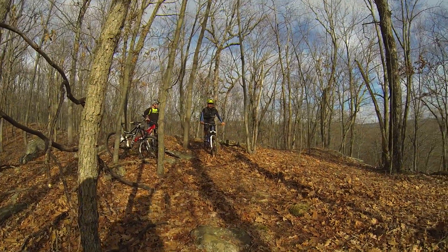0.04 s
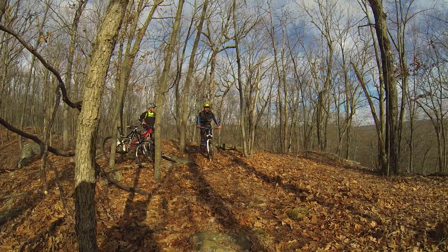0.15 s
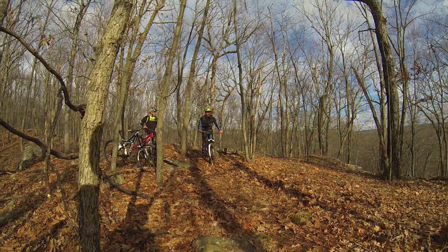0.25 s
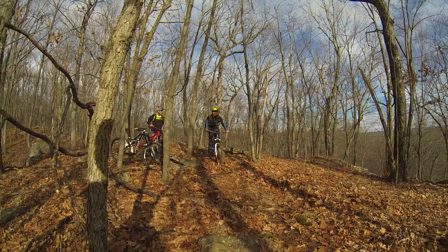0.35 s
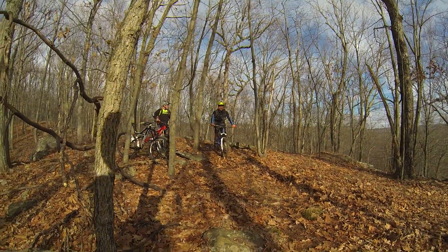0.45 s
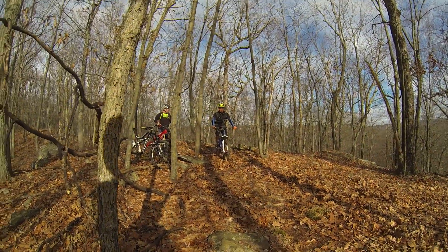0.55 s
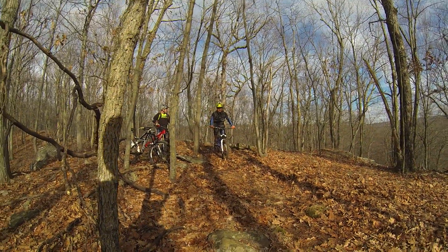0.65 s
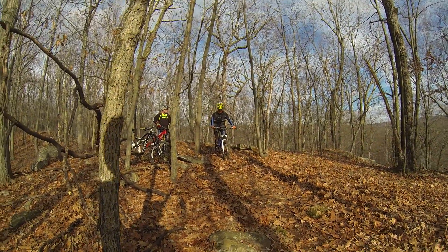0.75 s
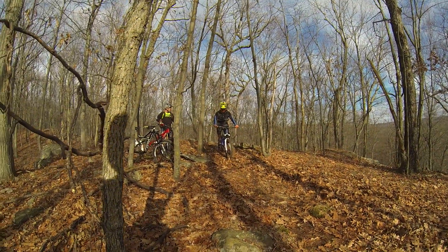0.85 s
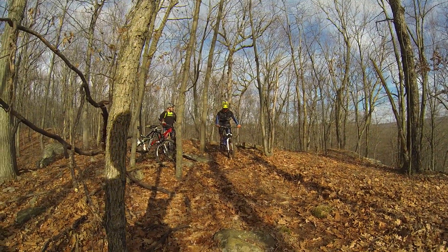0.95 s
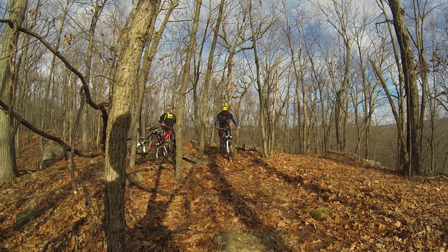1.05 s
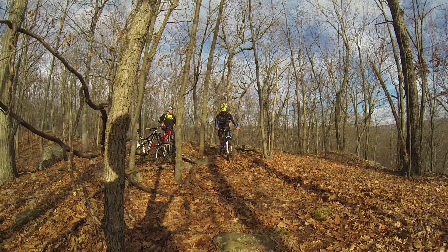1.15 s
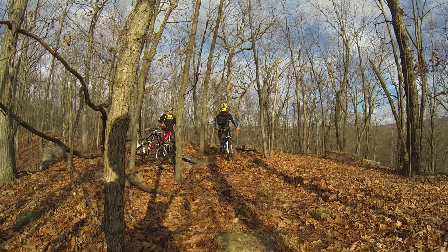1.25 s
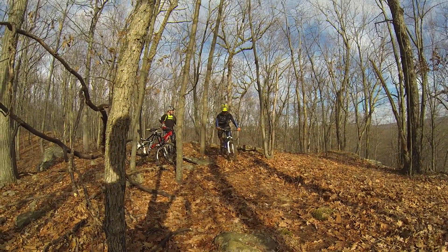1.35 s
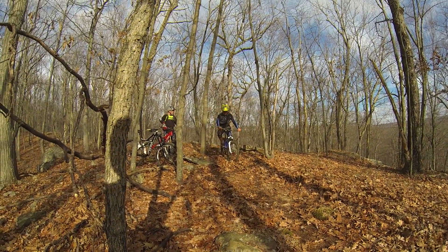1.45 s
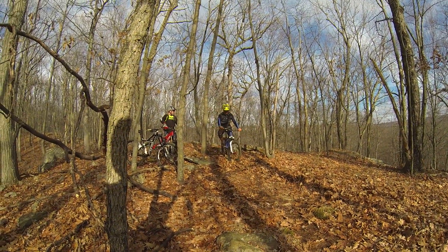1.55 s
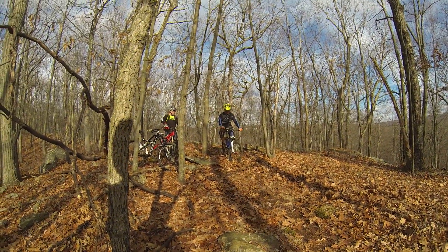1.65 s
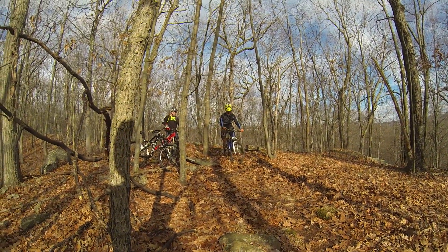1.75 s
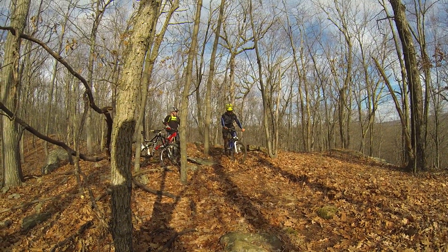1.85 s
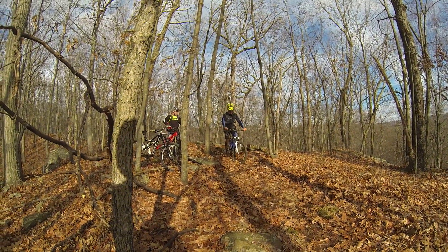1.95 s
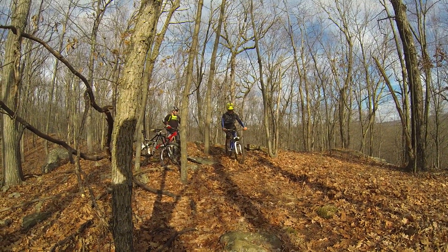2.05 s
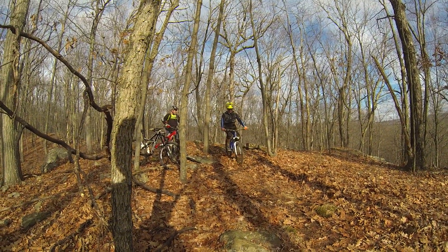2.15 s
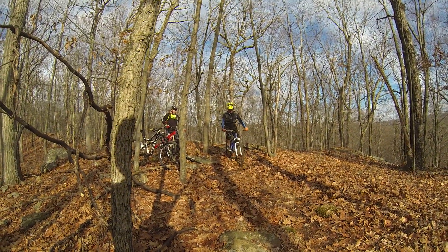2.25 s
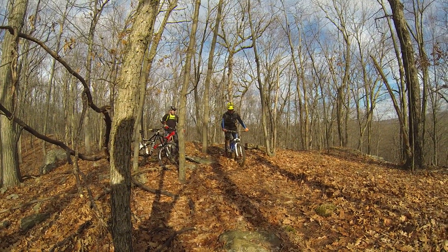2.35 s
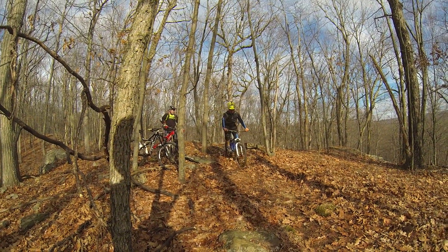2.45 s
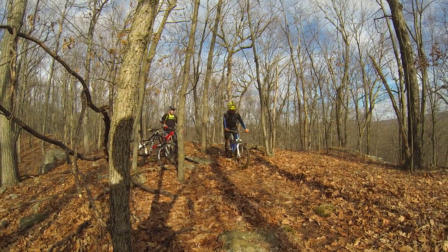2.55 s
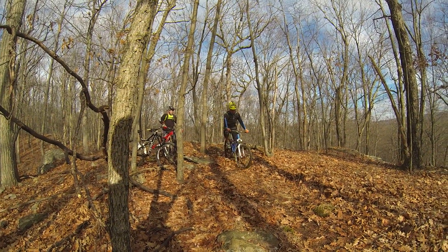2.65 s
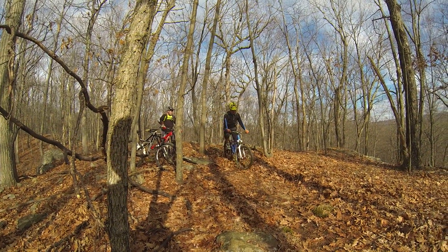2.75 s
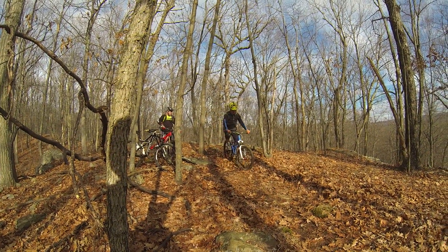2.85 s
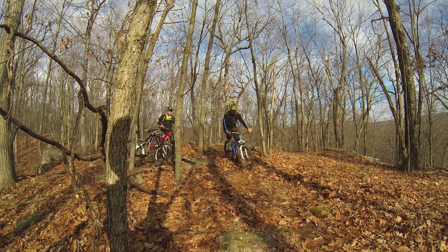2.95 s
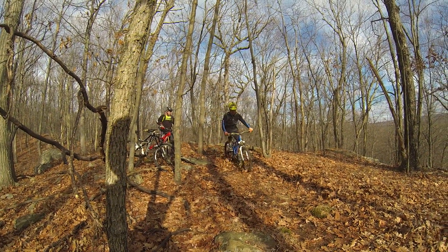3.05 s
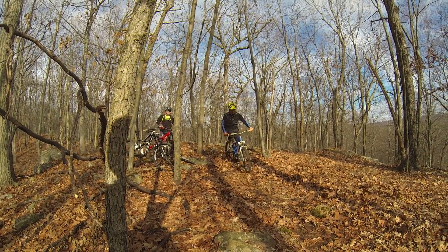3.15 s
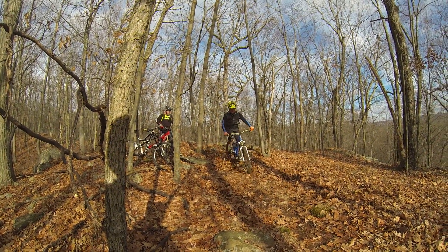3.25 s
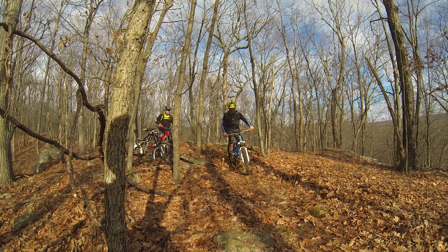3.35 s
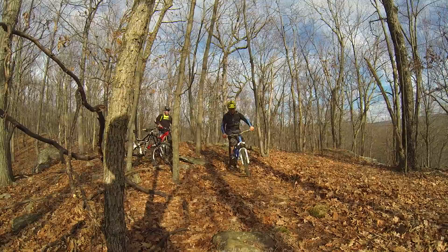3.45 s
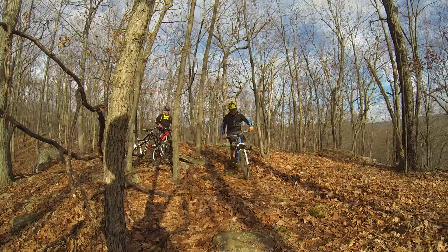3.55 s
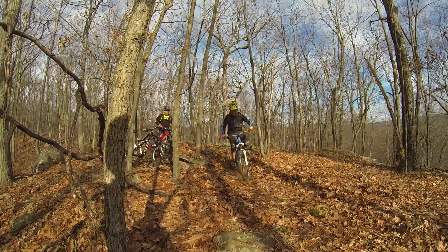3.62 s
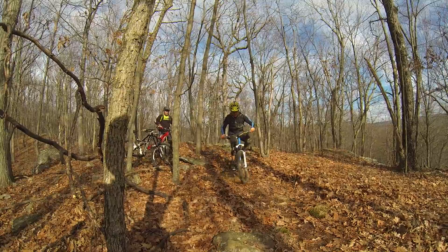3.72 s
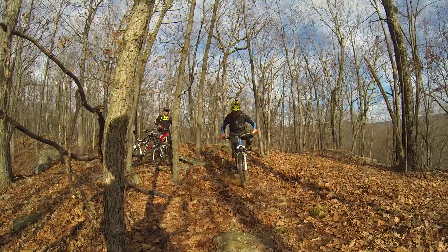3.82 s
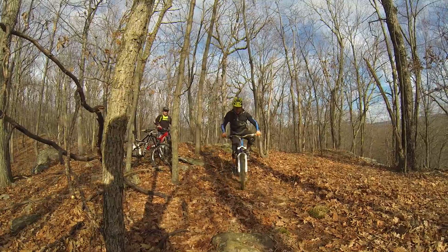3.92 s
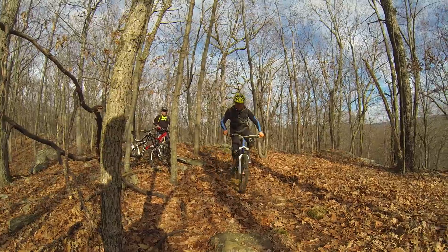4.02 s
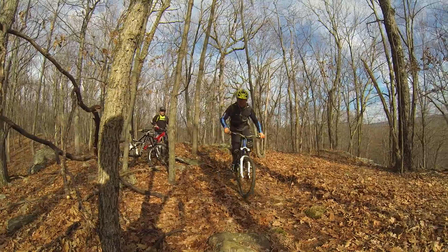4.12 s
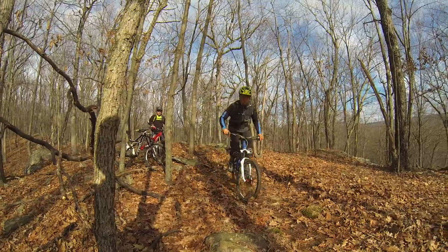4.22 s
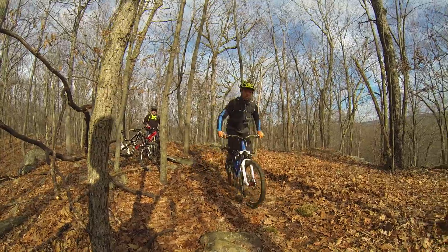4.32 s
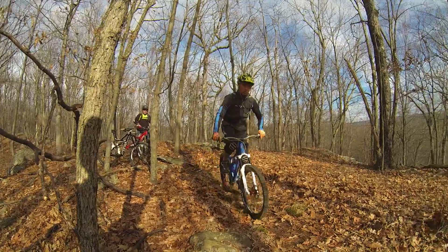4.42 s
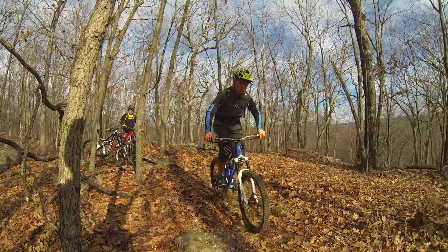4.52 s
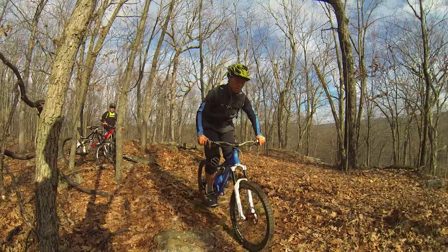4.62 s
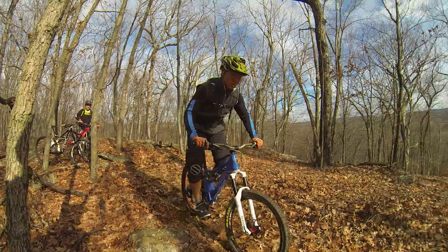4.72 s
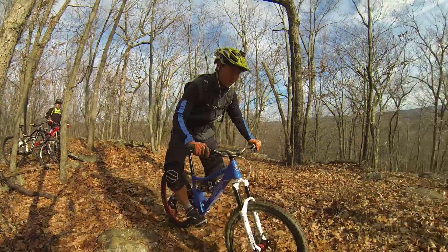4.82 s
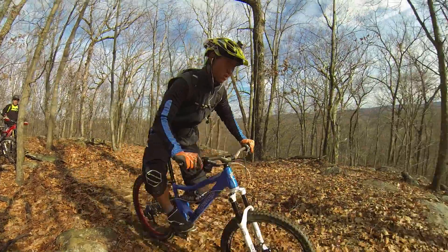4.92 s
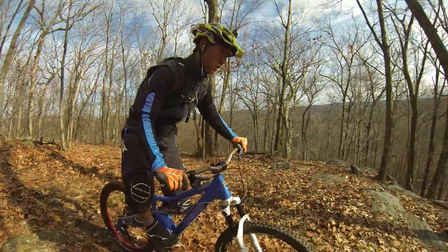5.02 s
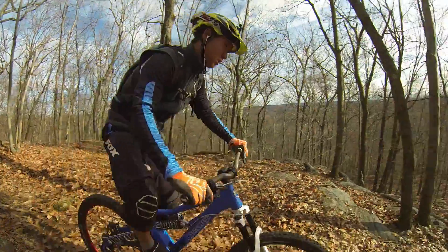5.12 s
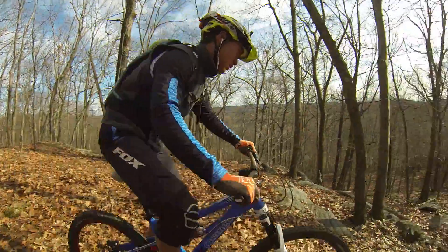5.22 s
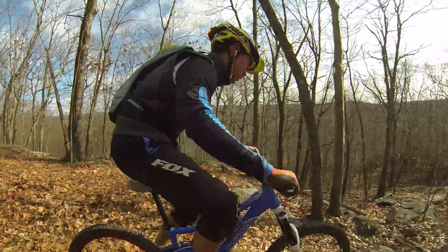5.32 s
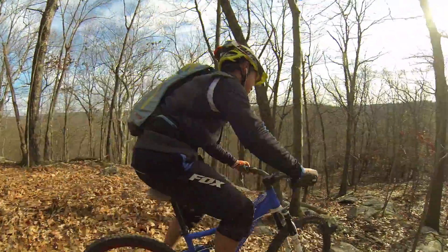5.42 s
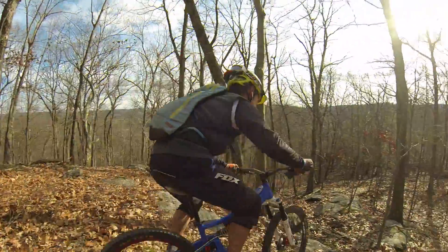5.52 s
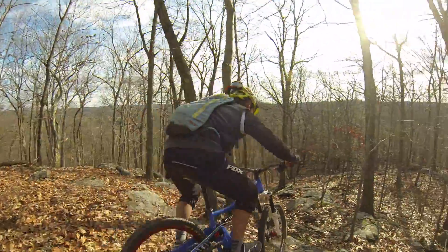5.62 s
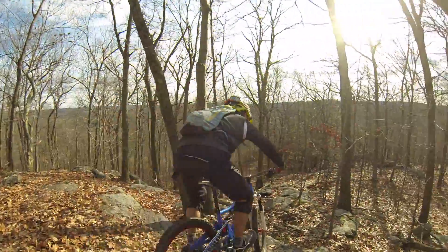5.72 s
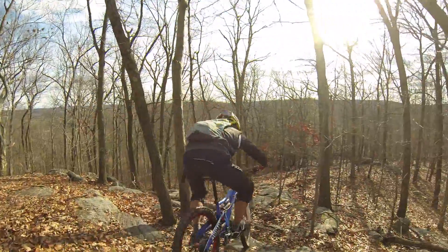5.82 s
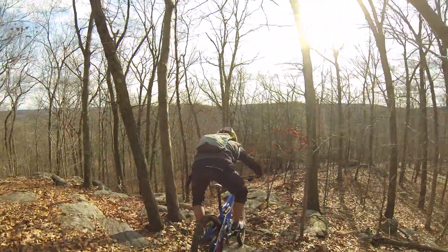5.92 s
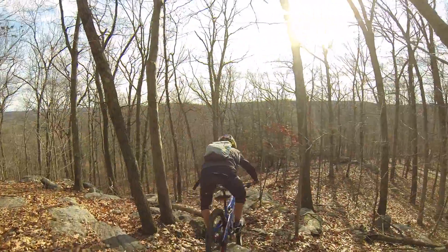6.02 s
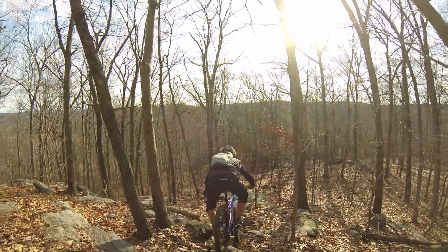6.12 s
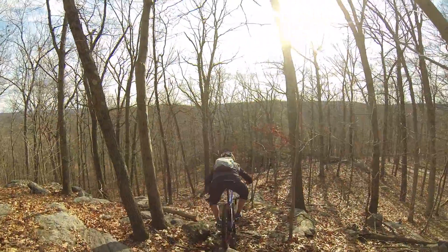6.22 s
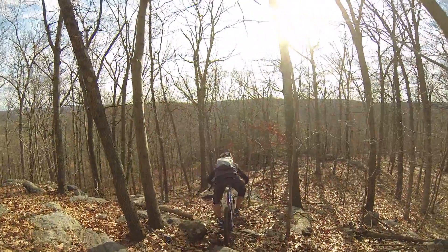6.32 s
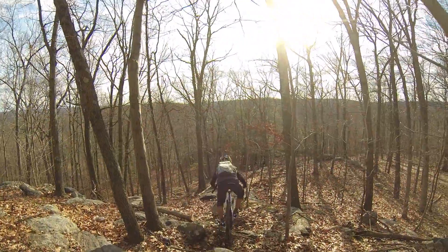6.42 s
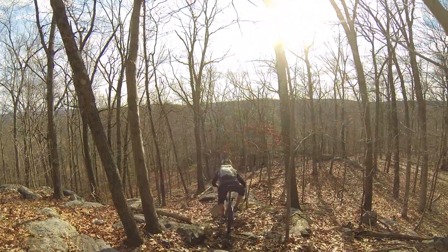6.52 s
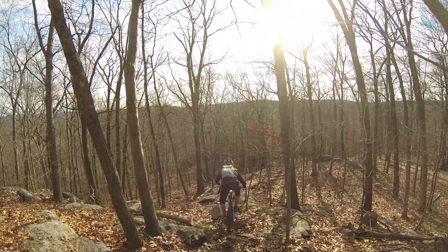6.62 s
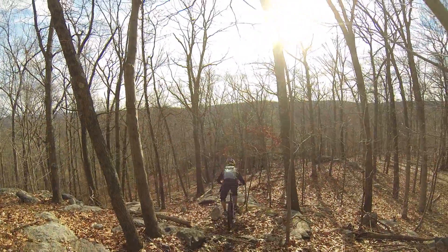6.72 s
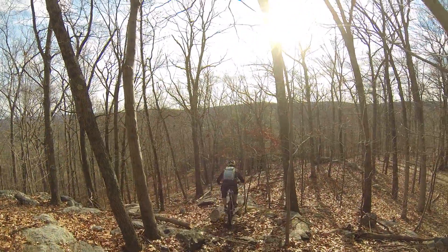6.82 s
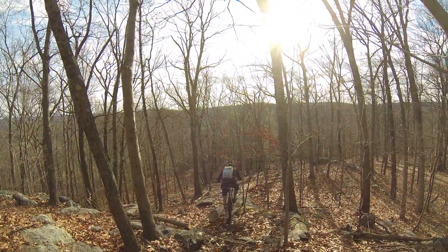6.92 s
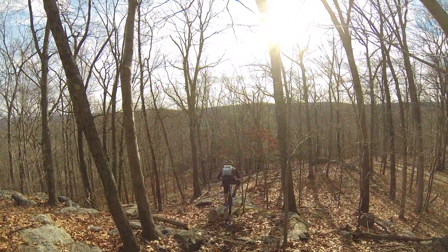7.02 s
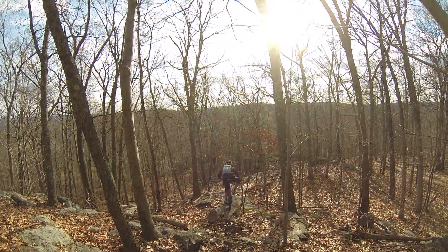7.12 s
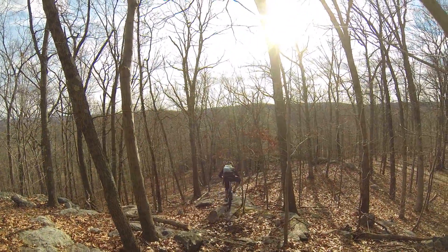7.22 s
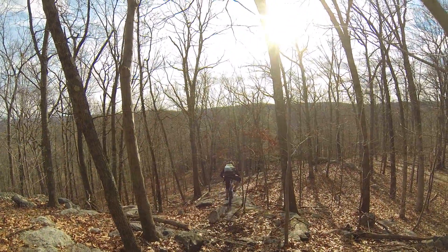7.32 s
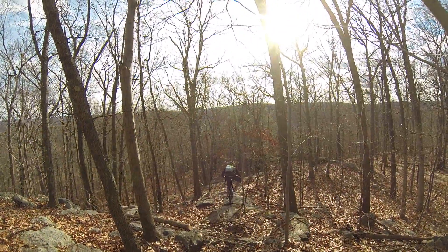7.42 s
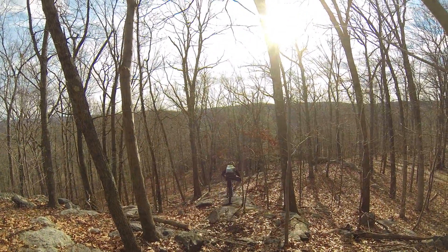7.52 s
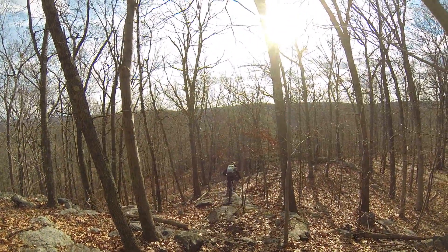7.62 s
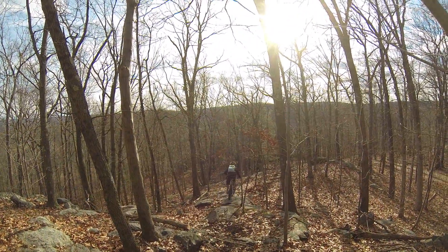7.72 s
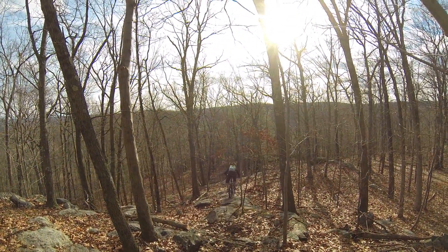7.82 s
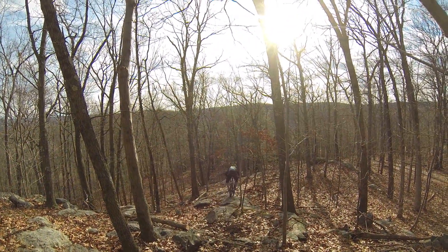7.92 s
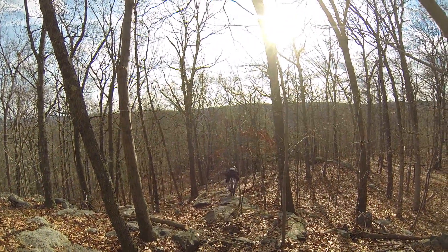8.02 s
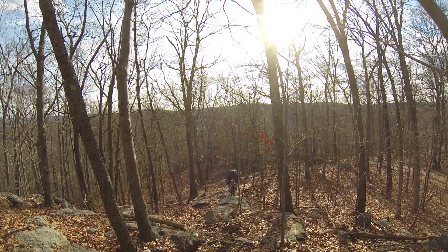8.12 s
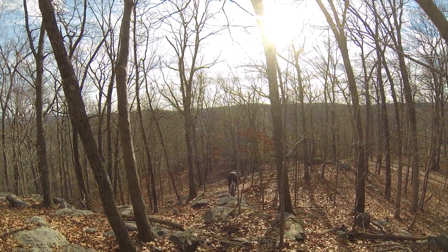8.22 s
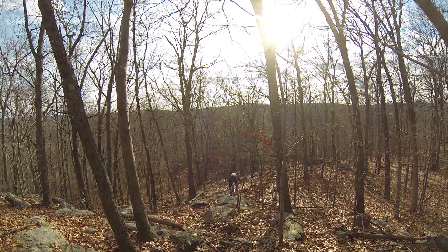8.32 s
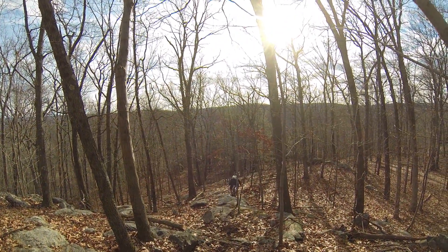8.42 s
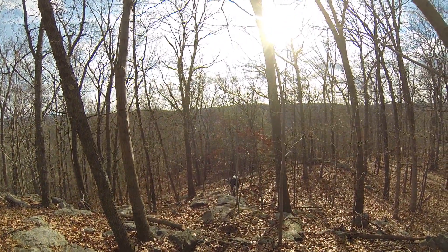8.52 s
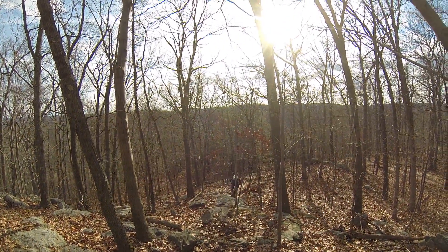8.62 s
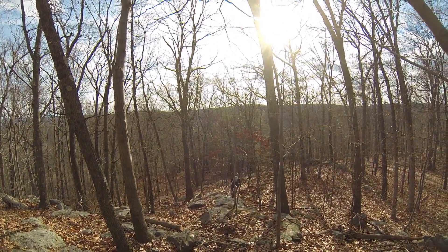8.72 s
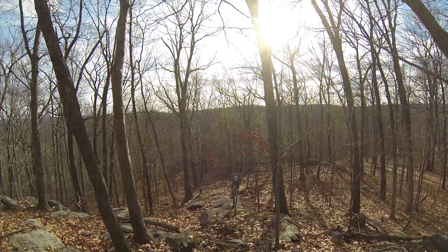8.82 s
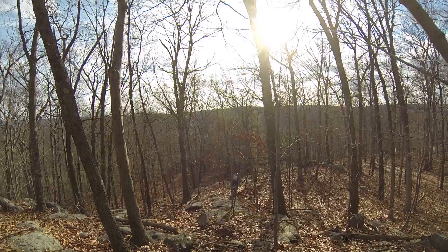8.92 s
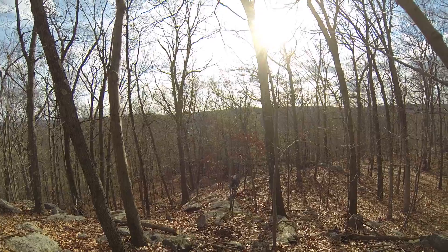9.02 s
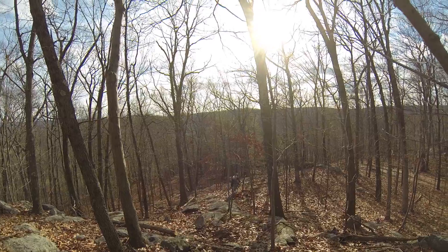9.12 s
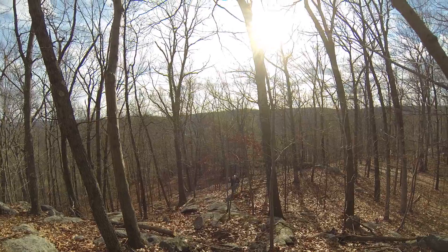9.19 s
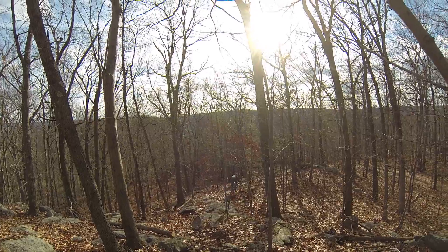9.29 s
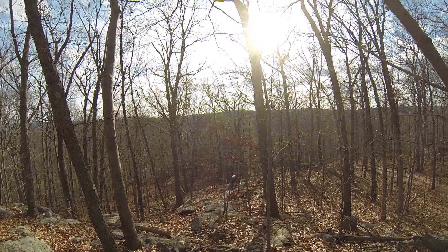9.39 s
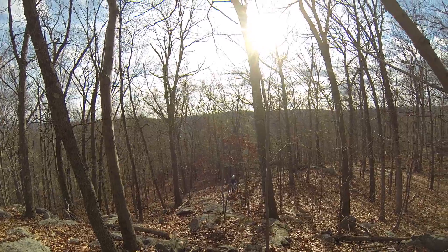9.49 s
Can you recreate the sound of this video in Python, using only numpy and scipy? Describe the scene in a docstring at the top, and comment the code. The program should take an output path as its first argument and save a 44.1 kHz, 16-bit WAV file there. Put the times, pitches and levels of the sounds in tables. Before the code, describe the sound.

Leaves rustle and a few dull bumps sound right by the microphone in quiet woodland. A mountain bike approaches, its tyres crunching dry leaves, with metallic knocks and a brief brake honk. It passes close, chain and frame clattering and freewheel ticking, while wind rumbles on the microphone. The bike then fades away with several short brake squeaks.

```python
"""A mountain bike rolls through dry leaves towards a small cased camera, passes close and runs downhill.
Leaves crackle as the tyres crush them, chain and frame clatter over bumps, the freewheel ticks,
and the brakes honk as their pads stick and slip. The metal sounds echo between the trees.
A foot shuffles in the leaves by the camera, and air buffets the microphone once the bike goes by."""
import sys
import numpy as np
from scipy import signal
from scipy.fft import rfft, irfft
from scipy.io import wavfile
from scipy.ndimage import uniform_filter1d

SR = 44100
rng = np.random.default_rng(int(sys.argv[2]) if len(sys.argv) > 2 else 0)


def bounce(signal):
    """Save signal as a 16-bit WAV file at the path given by the first command-line argument."""
    frames = np.transpose(np.atleast_2d(signal))
    limited = np.clip(frames, -1, 1)
    pcm = np.round(limited * 32767).astype(np.int16)
    wavfile.write(sys.argv[1], SR, pcm)


N = 421243
TIME = np.arange(N) / SR

# how hard the tyres crush the leaves: (time [s], level [dB])
CRUNCH_LEVEL = [(1.05, -69.5), (1.46, -55.5), (1.85, -57), (2.2, -46.5), (2.8, -44.5), (3.2, -47.5),
                (3.88, -48.5), (4.17, -53), (4.55, -41.5), (4.82, -37), (5.3, -38), (5.9, -35.5),
                (6.15, -40.5), (6.5, -43), (6.85, -47.5), (8.0, -51), (8.55, -49), (9.55, -52)]
# the treble of leaves heard from afar: (frequency [Hz], level [dB])
CRISP_FAR = [(2800, -49.5), (3800, 8.5), (4700, 3), (5500, 1.5), (6300, -5.5), (7000, -6.5), (8300, 0),
             (9100, -8.5), (10600, -0.5), (11700, -7.5), (12700, -9), (13500, -17), (15300, -17.5)]
# the treble of close clicks, with the camera case ringing near 8 kHz: (frequency [Hz], level [dB])
CRISP_NEAR = [(3000, -69), (4100, -11), (4700, -5), (5250, -7), (5800, -13.5), (7000, -19), (7700, -10.5),
              (8350, 0.5), (9300, -10), (10600, -10), (11800, -20.5), (12800, -16), (13900, -27),
              (15000, -27)]
# the notes the bike frame rings with: (frequency [Hz], level [dB], time to fade by 60 dB [s])
FRAME_NOTES = [(856, 9, 0.02), (1679, -5.5, 0.024), (1900, 8, 0.0046), (3240, -19, 0.011),
               (5200, -22, .008), (8350, -28, .009)]
# how the camera case muffles a knock: (frequency [Hz], level [dB])
CASE_MUFFLING = [(200, 42), (850, -1.5), (1200, 7), (1700, 4.5), (2700, 6), (3300, 9.5), (3900, 2),
                 (5200, 5.5), (7000, -5), (12000, -12)]


def amp(db):
    """Turns decibels into a number to multiply by."""
    return 10 ** (np.asarray(db) / 20)


def unit(x):
    """Scales a sound to an average strength (rms) of 1."""
    return x / np.sqrt(np.mean(x ** 2) + 1e-20)


def unit_hit(x):
    """Scales a hit so that its loudest 4 ms have an average strength of 1."""
    return x / np.sqrt(uniform_filter1d(x ** 2, 176, mode="constant").max())


def follow(rows):
    """Joins (time, value) points with straight lines."""
    return np.interp(TIME, *np.transpose(rows))


def swell(start, rise, hold, fall):
    """Rises smoothly from 0 to 1, holds and falls back; times in seconds."""
    ramp = np.minimum((TIME - start) / rise, (start + rise + hold + fall - TIME) / fall)
    return np.sin(np.pi / 2 * np.clip(ramp, 0, 1)) ** 2


def puff(middle, length):
    """A swell that falls as soon as it has risen."""
    return swell(middle - length / 2, length / 2, 0, length / 2)


def add(mix, s, sound):
    """Mixes a sound in at s seconds."""
    part = mix[max(round(s * SR), 0):][:len(sound)]
    part += sound[:len(part)]


def colour(x, points, size=8192):
    """Shapes a sound's lows and highs by (frequency, level) points; clicks keep their sharp start."""
    hz, db = np.transpose(points)
    log_hz = np.log(abs(np.fft.fftfreq(size, 1 / SR)) + 1)
    log_gain = np.log(amp(np.interp(log_hz, np.log(hz), db)))
    taps = np.fft.ifft(np.exp(np.conj(signal.hilbert(log_gain)))).real[:size // 2]
    return signal.oaconvolve(x, taps)[:len(x)]


def drift(rate, count=N):
    """A smooth random wobble that changes up to about rate times a second."""
    hz = np.fft.rfftfreq(count, 1 / SR)
    return unit(irfft(rfft(rng.standard_normal(count)) / np.sqrt(1 + (hz / rate) ** 6), count))


def resonate(x, hz, *widths_hz):
    """Keeps the sound near one pitch, filtering once for each width given."""
    for width_hz in widths_hz:
        x = signal.lfilter(*signal.iirpeak(min(hz, SR / 2 - 1), hz / width_hz, SR), x)
    return x


def snaps(per_s, spread_db):
    """Clicks at random times and of uneven sizes."""
    size = amp(spread_db * np.minimum(rng.exponential(1, N), 5))
    return unit(size * rng.choice([-1, 1], N) * (rng.random(N) < per_s / SR))


def woodland():
    """Distant air in bare trees, swelling slightly, and the faint stir of dry leaves."""
    # the hush of the trees: (frequency [Hz], level [dB])
    hush = [(25, -1), (90, -4), (170, -7), (300, -6.5), (480, -11), (850, -4.5), (1200, -15), (1700, -16),
            (2500, -31), (3100, -19.5), (4100, -41), (7000, -42.5), (8400, -43), (13000, -57)]
    air = amp(-50.5 + 0.87 * drift(rate=1.9)) * unit(colour(rng.standard_normal(N), hush))
    stir = snaps(per_s=900, spread_db=5.5) + rng.standard_normal(N)
    return air + amp(-74.5) * unit(colour(stir, CRISP_FAR))


def tree_echoes(x, fade_s, level_db):
    """Trunks scatter a sound back as thin echoes that drop by 60 dB in fade_s."""
    # the tone of the echoes: (frequency [Hz], level [dB])
    echo_tone = [(150, 21), (900, 6.5), (2200, -5.5), (5000, 12), (12000, -5.5)]
    t = np.arange(SR // 2) / SR
    echoes = rng.standard_normal(len(t)) * (rng.random(len(t)) < 1500 / SR) * (t > .008)
    tail = colour(echoes * np.exp(-np.log(1000) * t / fade_s), echo_tone)
    return amp(level_db) * signal.oaconvolve(x, tail / np.linalg.norm(tail))[:N]


def wind():
    """Swirling air pushes on the microphone in lumps; strong gusts also throb and flutter."""
    # single gusts: (middle time [s], length [s], level [dB])
    gust_list = [(1.9, 0.073, -48), (4.731, 1, -44), (5.414, 0.22, -24), (5.527, 0.12, -23),
                 (6.01, 0.38, -28), (6.698, 0.11, -32), (7.056, 0.97, -40), (7.73, 0.15, -37.5),
                 (8.587, .08, -34), (8.726, 0.049, -34), (9.35, 0.061, -35.5), (9.513, .13, -35)]
    # the rumble of air on the microphone: (frequency [Hz], level [dB])
    rumble = [(10, -8), (26, -0.5), (50, -5.5), (85, -6), (110, -15.5), (170, -16), (260, -26),
              (450, -56.5), (1000, -115)]
    wake_s, fade_db_per_s = 5.27, 13.5  # the air dragged behind the bike arrives, then dies away
    passed = swell(wake_s, rise=0.11, hold=N / SR, fall=1)
    wake = passed * amp(-25 - fade_db_per_s * (TIME - wake_s))
    calm, breeze = amp(-53), passed * amp(-44)
    gusts = [amp(db) * puff(s, length) for s, length, db in gust_list]
    level_db = 10 * np.log10(sum(air ** 2 for air in [calm, breeze, wake, *gusts]))
    swirls = unit(colour(rng.standard_normal(N), rumble))
    throb = unit(resonate(resonate(rng.standard_normal(N), 99, 30), 94, 92))
    flutter = unit(resonate(resonate(rng.standard_normal(N), 181, 130), 120, 184))
    strength = amp(.5 * np.minimum(level_db + 23, 0))
    lumps_db = 2 * drift(rate=10)
    return amp(level_db + lumps_db) * (swirls + strength * (0.3 * throb + 0.24 * flutter))


def swept_leaves():
    """A shoe or wheel sweeps leaves aside in swells of fine crackle that make the camera case ring."""
    # sweeps of leaves: (start [s], rise [s], hold [s], fall [s], level [dB])
    sweeps = [(-.1, 0.084, 0.48, 0.32, -48.5), (0.179, 0.094, 0.072, 0.048, -43.5),
              (0.269, 0.077, .005, 0.083, -36), (6.37, 0.059, 0.052, 0.084, -36)]
    # the tone of swept leaves: (frequency [Hz], level [dB])
    rustle_tone = [(200, -11.5), (550, -11), (870, 0), (1200, -7), (1700, 2), (2250, -7.5), (2720, -19.5),
                   (3200, -12), (3850, -27.5), (4900, -23.5), (6900, -36), (8450, -16.5), (11400, -43),
                   (15000, -43)]
    level = sum(amp(db) * swell(*shape) for *shape, db in sweeps)
    grains = snaps(per_s=3500, spread_db=4.5) + 0.83 * rng.standard_normal(N)
    rustle = colour(grains, rustle_tone)
    case_ring = 4.0 * resonate(rustle, 12700, 800)
    return level * unit(rustle + case_ring)


def bumps():
    """Dull bumps: each is a soft push of a cycle or two and a brief hollow knock."""
    # hand and feet at the camera, wheels on roots: (time [s], level [dB], pitch [Hz])
    thuds = [(0.095, -22.5, 149), (.17, -26.5, 800), (0.305, -35, 197), (.69, -35, 215), (.711, -30.5, 198),
             (0.837, -29.5, 158), (2.2915, -29, 261), (4.509, -26, 480), (4.598, -22.5, 157),
             (5.6411, -22, 517), (6.0612, -16.5, 444), (6.466, -14, 477), (7.234, -29.5, 482),
             (9.0195, -24.5, 360)]
    out, t = np.zeros(N), np.arange(SR // 12) / SR
    for s, db, hz in thuds:
        push = np.sin(2 * np.pi * hz * t) * np.exp(-t * hz / 0.41)
        hollow = 0.81 * np.sin(2 * np.pi * 850 * t) * np.exp(-t / 0.0011)
        add(out, s, amp(db) * (push + hollow))
    return signal.lfilter(*signal.butter(2, 1600, fs=SR), out)


def brake_drag():
    """Pads skim the brake disc with a thin, ticking sizzle."""
    # light touches of the pads: (start [s], length [s], level [dB])
    touches = [(3.75, 0.39, -74.5), (4.347, 0.26, -64)]
    ease_s = 0.08
    level = sum(amp(db) * swell(s, ease_s, length - 2 * ease_s, ease_s) for s, length, db in touches)
    rub = snaps(per_s=200, spread_db=-1.5) + .5 * rng.standard_normal(N)
    grip = amp(4.5 * drift(rate=60))
    return level * grip * unit(resonate(resonate(rub, 10600, 930), 8800, 2000))


def brake_honk(pitch_hz=872):
    """Pads stick and slip, so the brake disc sings one clean note at each squeeze."""
    # squeezes: (middle time [s], length [s], level [dB], octave above against the note [dB])
    squeezes = [(2.409, 0.14, -34, -6.5), (2.494, 0.11, -36.5, -5), (2.56, .09, -50, -9)]
    phase = 2 * np.pi * np.cumsum(pitch_hz * (1 + 0.0013 * drift(rate=60))) / SR
    return sum(amp(db) * puff(s, length) * unit(np.sin(phase) + amp(octave_db) * np.sin(2 * phase))
               for s, length, db, octave_db in squeezes)


def brake_squeaks():
    """Slipping pads hiss and squeak in short arches of pitch, rough under hard braking."""
    # squeaks: (start [s], length [s], level [dB], pitch [Hz], glide [share of the pitch],
    # roughness [0-1], octave above against the note [dB])
    squeaks = [(0.115, 0.074, -40.5, 1340, -0.074, 0.2, -28), (7.274, .086, -47.5, 1270, -0.074, 0.3, -28),
               (7.418, 0.075, -50, 1420, 0.088, 0.33, -22), (7.817, 0.1, -54, 1346, -0.11, 0.4, -34),
               (8.397, 0.033, -32.5, 1053, 0.033, 0.48, -9), (8.417, 0.0544, -36.5, 1008, 0.031, 0.99, 1),
               (8.661, 0.084, -36.5, 1091, -0.11, 0.81, -1.5), (9.027, .077, -50.5, 1406, 0.1, 0, -15)]
    # the hiss of the pads: (frequency [Hz], level [dB])
    pad_hiss = [(6500, -39), (8200, -7), (9200, 0), (10600, -4), (11800, -22), (15000, -32)]
    out = np.zeros(N)
    for s, length, db, pitch_hz, glide, rough, octave_db in squeaks:
        count = round(length * SR)
        position = np.linspace(-1, 1, count)
        arch = 1 + glide * position / 2 - .13 * position ** 2
        jitter = 1 + .14 * rough ** 2 * drift(rate=300, count=SR)[:count]
        flutter = amp(4 * rough * drift(rate=260, count=SR)[:count])
        phase = 2 * np.pi * np.cumsum(pitch_hz * arch * jitter) / SR
        tone = np.sin(phase) + amp(octave_db) * np.sin(2 * phase)
        hiss = amp(-29) * unit(colour(rng.standard_normal(SR), pad_hiss))[:count]
        add(out, s, amp(db) * (unit(tone * flutter) + hiss) * signal.windows.tukey(count, .6))
    return out


def freewheel():
    """Small catches in the hub tick over a toothed ring; far off, only a thin buzz carries back."""
    # the ticking slows as the bike coasts past, then races downhill: (time [s], rate [ticks/s])
    tick_rate = [(4.997, 41.5), (5.35, 39), (5.47, 31.4), (6.2, 28.5), (6.65, 50), (7.5, 52), (8.2, 57),
                 (9.55, 61)]
    rate = follow(tick_rate) * (TIME >= tick_rate[0][0])
    teeth_passed = np.ceil(np.cumsum(rate) / SR)
    pass_s, fade_db_per_s = 5.47, 18  # loudest as the hub goes by
    level = amp(-29 - fade_db_per_s * abs(TIME - pass_s))
    ticks, strikes, t = np.zeros(N), np.zeros(N), np.arange(SR // 30) / SR
    for at in np.flatnonzero(np.diff(teeth_passed)):
        strike = rng.standard_normal(len(t)) * (rng.random(len(t)) < .2) * np.exp(-t / .003)
        hub = colour(resonate(strike, 2500, 600, 1800), CASE_MUFFLING)
        catch = colour(strike, CRISP_NEAR)
        tick = 0.18 * unit_hit(catch + resonate(catch, 12000, 3000)) + 0.5 * unit_hit(hub)
        uneven = amp(4.0 * rng.standard_normal())
        add(ticks, at / SR, uneven * level[at] * tick)
        add(strikes, at / SR, uneven * strike)
    buzz = unit(resonate(strikes, 10000, 1300, 2600))
    buzz_s = 5.68
    buzz_level = swell(buzz_s, rise=0.51, hold=N / SR, fall=1) * amp(-75.5 - 2.5 * (TIME - buzz_s))
    return ticks + buzz_level * buzz


def frame_ring(x, direct):
    """A blow heard directly and through the fading notes it wakes in the bike frame."""
    t = np.arange(SR // 16) / SR
    body = sum(amp(db) * np.exp(-np.log(1000) * t / fade_s) * np.cos(2 * np.pi * hz * t)
               for hz, db, fade_s in FRAME_NOTES)
    return direct * x + signal.fftconvolve(x, body / np.linalg.norm(body))[:len(x)]


def rattle():
    """Cables and chain jiggle over small bumps: soft clinks of many pitches, more so going downhill."""
    descent_db = np.interp(TIME, [5.0, 6.5], [-8, -4])
    pitches_hz = np.geomspace(1150, 2400, 8)
    clinks = sum(resonate(snaps(per_s=8, spread_db=1.3), hz, 230, 900) for hz in pitches_hz)
    return amp(follow(CRUNCH_LEVEL) + descent_db) * unit(frame_ring(clinks, direct=2.7))


def knocks():
    """Chain and frame knock, then loose parts chatter; the looser they are, the more they ring."""
    # knocks: (time [s], level [dB], pitch [Hz], looseness [0-1], metal tick against the knock [dB])
    hits = [(1.31, -35.5, 1320, 1, -46), (1.3279, -36.5, 1410, 0.6, -48), (1.489, -47, 1900, 0.1, -18),
            (1.6707, -38, 1340, 0.08, -39), (1.8685, -41, 1720, 0.24, -30), (2.0076, -39, 1430, 1, -24),
            (2.2648, -23.5, 1440, 0.12, -43), (2.293, -26.5, 1570, 0.26, -43),
            (2.7702, -26.5, 1400, 0.08, -26), (3.127, -37.5, 1460, 0.3, -36),
            (3.239, -38.5, 1630, .05, -45), (4.506, -35.5, 1070, 0.1, -34), (4.599, -31.5, 1720, 0.4, -40),
            (4.6328, -37.5, 1570, 0.1, -38), (4.7572, -32.5, 1680, 0.33, -21),
            (5.0644, -30.5, 2200, 0, -14), (5.2433, -30, 2030, 0, -34), (5.2655, -21.5, 1980, 0.19, -19),
            (5.3184, -27, 2180, 0.06, -19), (5.6399, -25.5, 940, 0.18, -38), (5.735, -25, 1690, 1, -18),
            (5.763, -30, 1490, 0.34, -12), (5.7701, -13, 1220, 0.07, -39), (5.806, -26, 1430, 0.11, -23),
            (5.955, -26.5, 2060, 0.12, -22), (6.006, -21.5, 1480, 0.2, -37), (6.1178, -26, 1580, 0.17, -33),
            (6.2281, -23, 1830, 0.26, -19.5), (6.4576, -26.5, 1210, 0.18, -10.5),
            (6.638, -36, 1590, .6, -28), (7.0647, -43, 1710, 0.4, -23), (7.2323, -39, 1190, 0, -20),
            (8.2248, -41, 1740, 0.4, -35)]
    out, t = np.zeros(N), np.arange(SR // 8) / SR
    for s, db, hz, loose, tick_db in hits:
        chatter = rng.uniform(-0.72, 1, len(t)) * (rng.random(len(t)) < 1800 / SR)
        blows = 6.0 * loose * chatter * np.exp(-t / 0.0096) * (t > .001)
        blows[0] = 1  # the first blow
        damping = .4 + np.exp(-loose / .15)
        pulse = resonate(blows, hz, damping * hz, hz, 2 * hz)
        body = colour(frame_ring(pulse, direct=1.5 * damping), CASE_MUFFLING)
        burst = .3 * rng.standard_normal(len(t)) * np.exp(-t / .0018)
        tick = colour(blows + burst, CRISP_NEAR)
        add(out, s, amp(db) * (unit_hit(body) + amp(tick_db) * unit_hit(tick)))
    return out


def tyres():
    """Knobbly tyres crush leaves in clumps; close by, single snaps stand out and the treble hardens."""
    # the tones of crushed leaves and of the soil below: (frequency [Hz], level [dB])
    crunch_tone = [(250, -6), (700, -11.5), (1150, -9), (1450, 4.5), (1750, 7), (2050, 3.5), (2450, -1.5),
                   (2750, -4), (3100, -8), (3550, -9), (3950, -20), (6000, -59)]
    soil_tone = [(60, -38), (180, 2), (300, -4), (470, -3.5), (680, 2), (870, 4), (1100, 5), (1400, -8.5),
                 (2500, -37)]
    # how the crunch dulls once the bike is heard from behind: (frequency [Hz], level [dB])
    dulling = [(400, 0), (1000, 10), (1500, -1.5), (1950, 4.5), (2500, 3), (2800, 0), (3600, 2.5),
               (4500, 2)]
    near = np.clip(0.09 + swell(start=4.44, rise=0.78, hold=0.87, fall=1.6), 0, 1)
    gone = np.interp(TIME, [5.9, 6.9], [0, 1])
    lull = swell(start=5.17, rise=.12, hold=.32, fall=.12)  # the treble dips as the wheels pass
    crunch_db = follow(CRUNCH_LEVEL)
    crisp_db = crunch_db - 18.5 + 4 * near - 4 * gone - 9 * lull
    soil_db = crunch_db - 11 + 6 * near + 5 * gone
    clumps = amp(1.5 * drift(rate=40))
    crackle = snaps(per_s=2400, spread_db=3.2)
    leaves = unit(clumps * (crackle + .7 * rng.standard_normal(N)))
    fine_snaps = 1.03 * snaps(per_s=930, spread_db=1.0)
    hiss = (1.6 - 0.45 * near) * rng.standard_normal(N)
    fizz = unit(clumps * (crackle + fine_snaps + hiss))
    ahead = unit(colour(leaves, crunch_tone))
    crunch = (1 - gone) * ahead + gone * unit(colour(ahead, dulling))
    soil = unit(colour(clumps * snaps(per_s=1200, spread_db=0.5), soil_tone))
    crisp = np.sqrt(near) * unit(colour(fizz, CRISP_NEAR))
    crisp += np.sqrt(1 - near) * unit(colour(leaves, CRISP_FAR))
    return amp(crunch_db) * crunch + amp(soil_db) * soil + amp(crisp_db) * crisp


def scene():
    """The bike among the trees and the sounds at the camera, in one channel."""
    metal = knocks() + rattle() + freewheel() + brake_honk() + brake_squeaks() + brake_drag()
    bike = tyres() + metal + tree_echoes(metal, fade_s=0.22, level_db=-11.5)
    return (bike + swept_leaves() + bumps() + wind() + woodland())[None]


def record(dry, cutoff_hz=15400):
    """The camera loses the very highest treble."""
    low_pass = signal.firwin(511, cutoff_hz, window=("kaiser", 9), fs=SR)
    return signal.oaconvolve(dry, low_pass[None], "same")


dry = scene()
out = record(dry)
bounce(out)
```